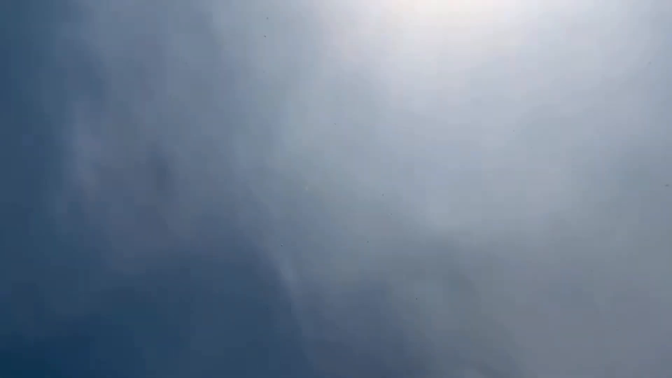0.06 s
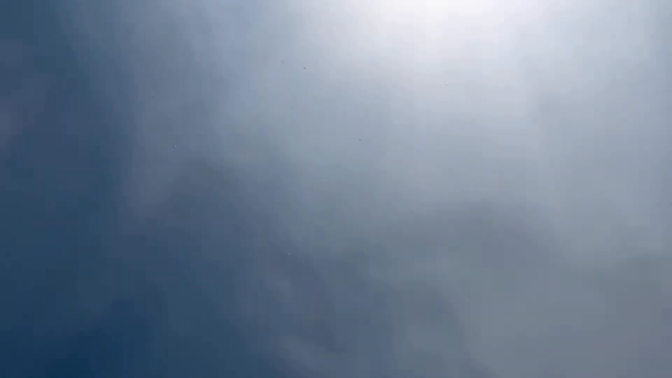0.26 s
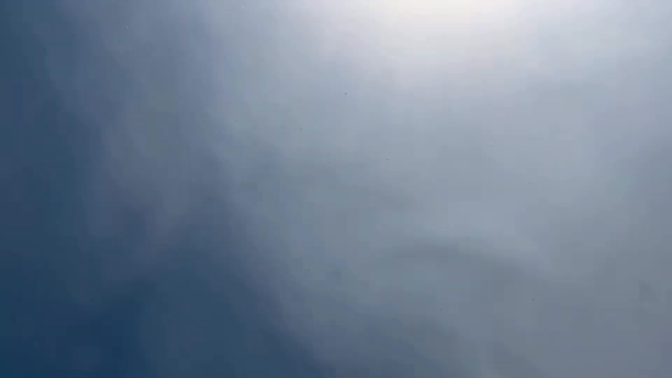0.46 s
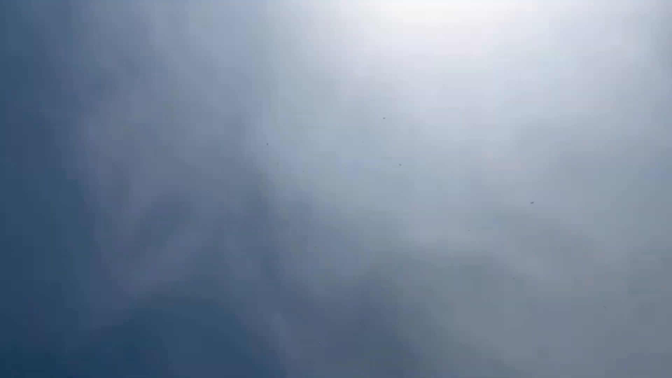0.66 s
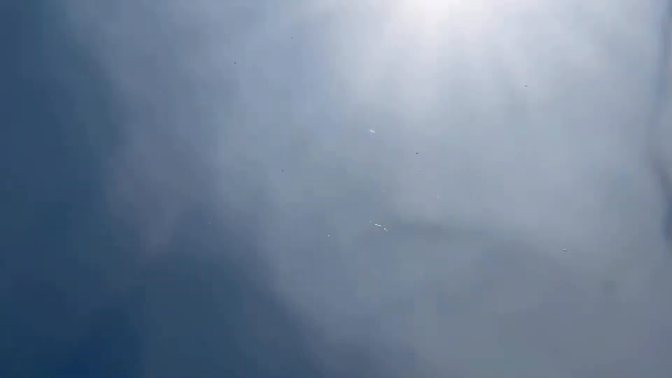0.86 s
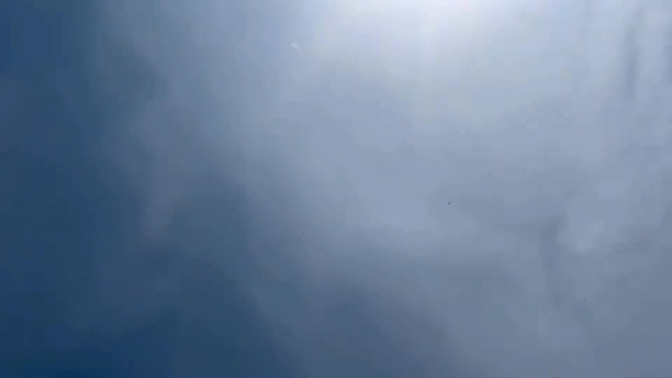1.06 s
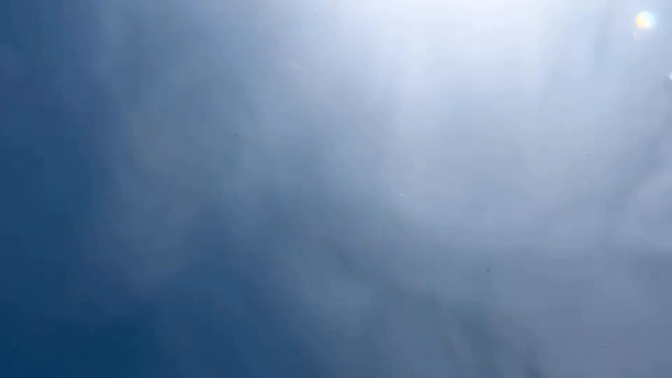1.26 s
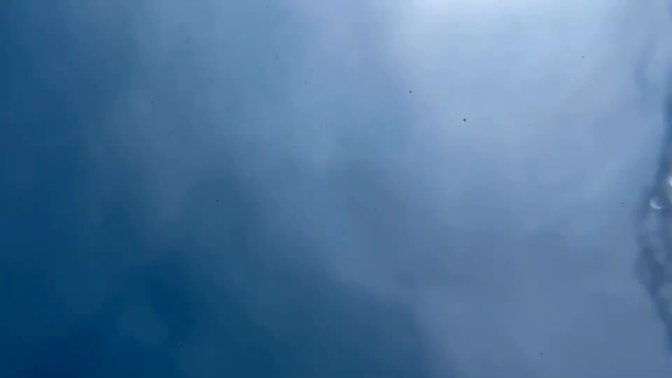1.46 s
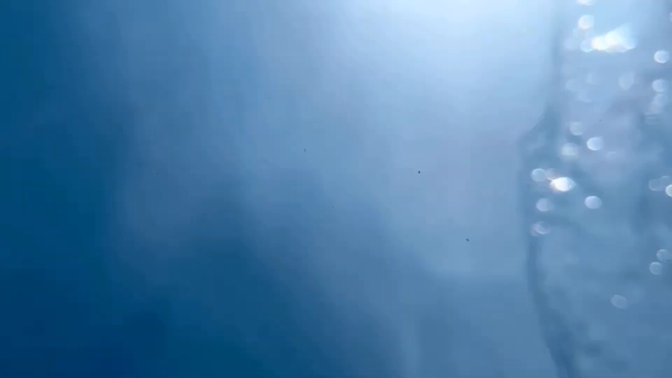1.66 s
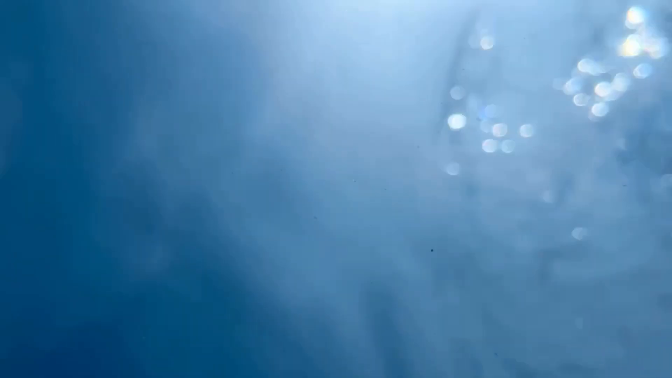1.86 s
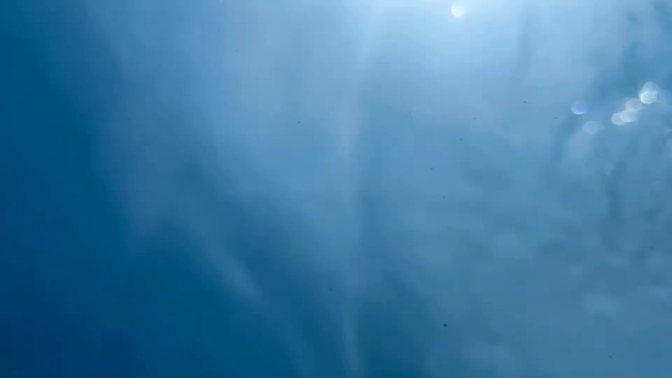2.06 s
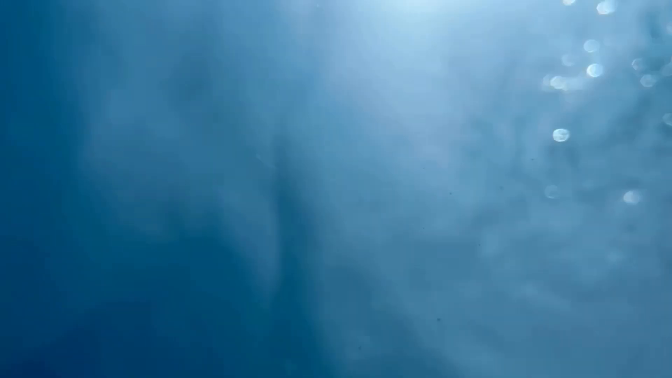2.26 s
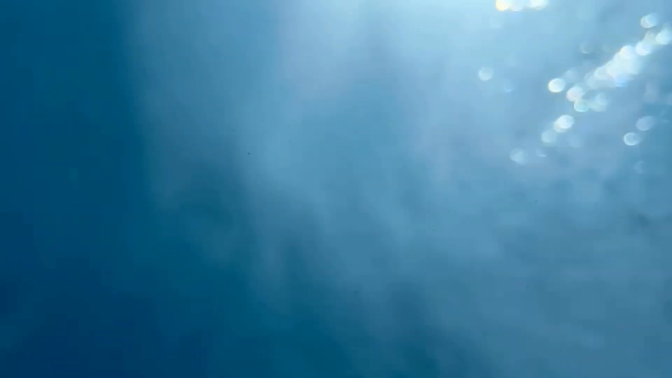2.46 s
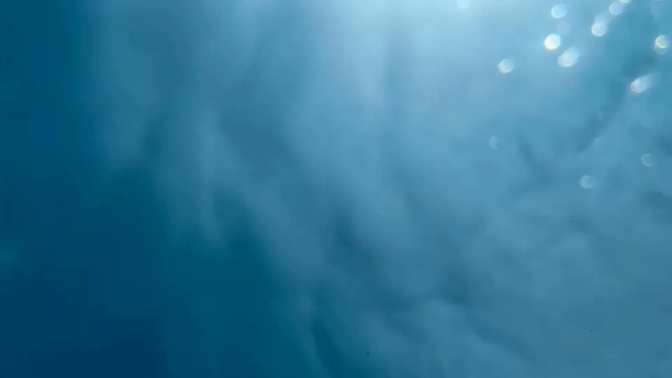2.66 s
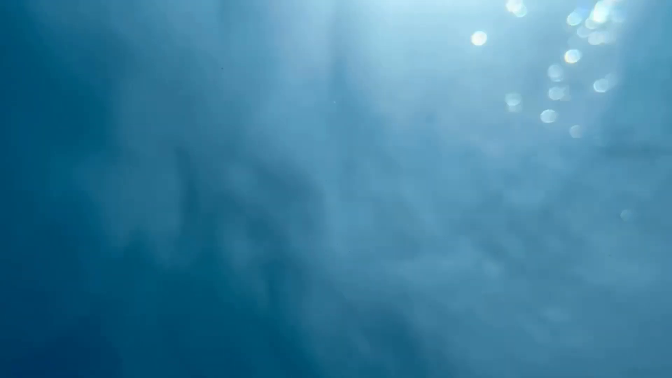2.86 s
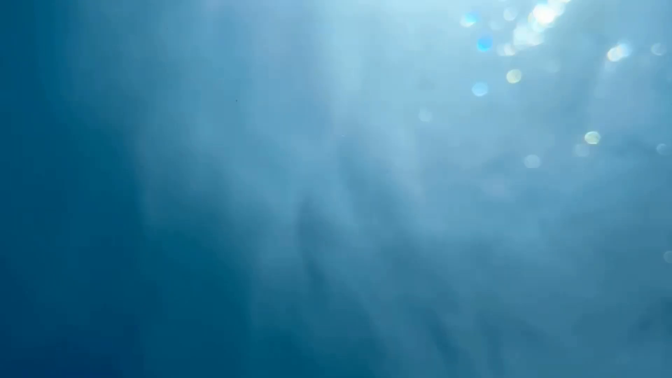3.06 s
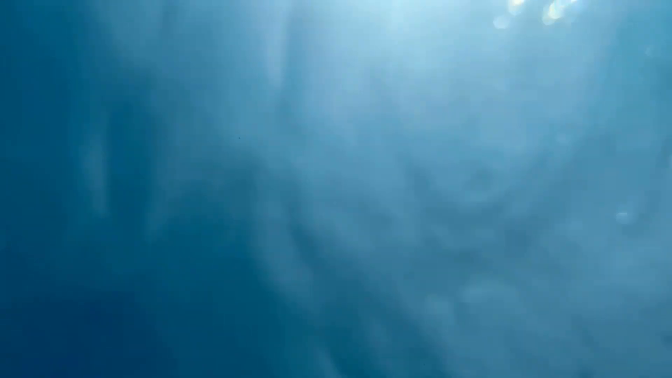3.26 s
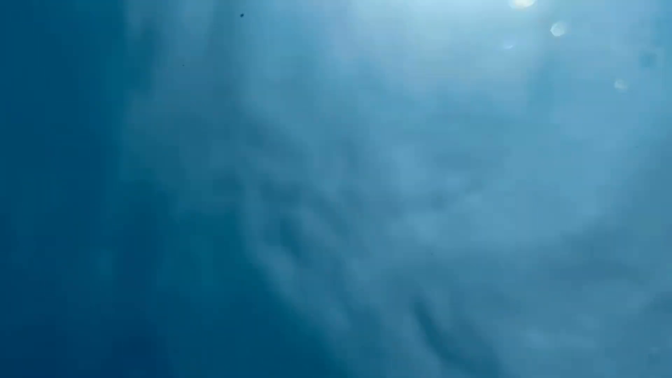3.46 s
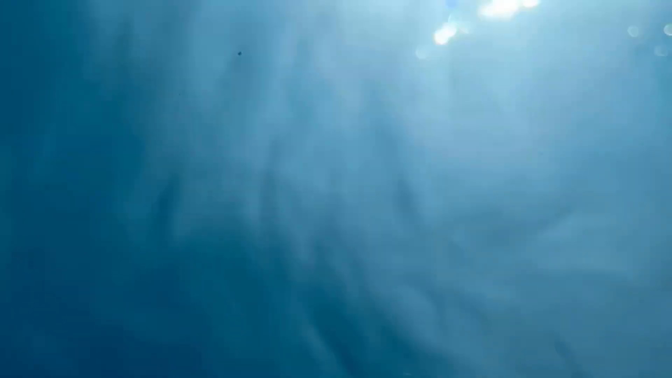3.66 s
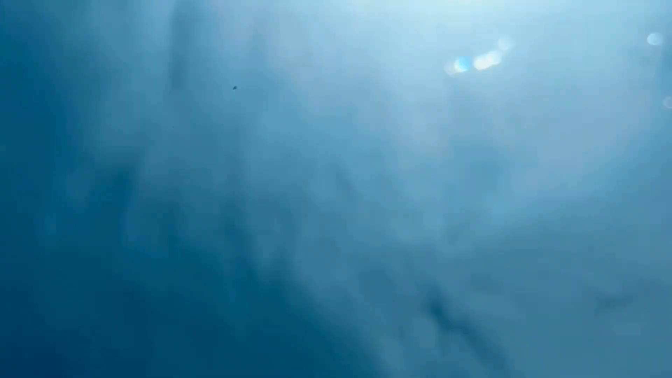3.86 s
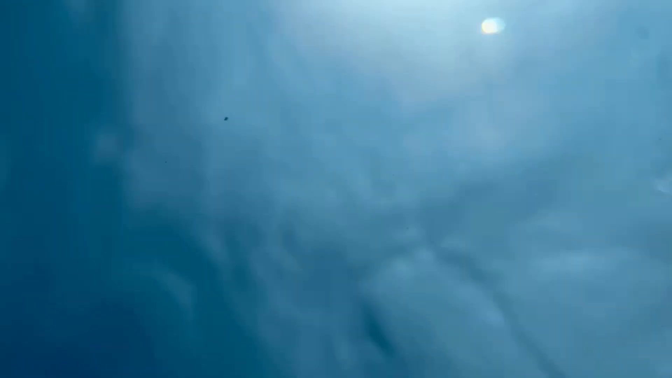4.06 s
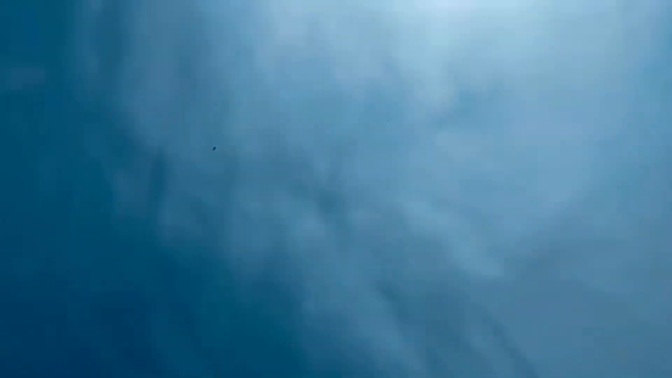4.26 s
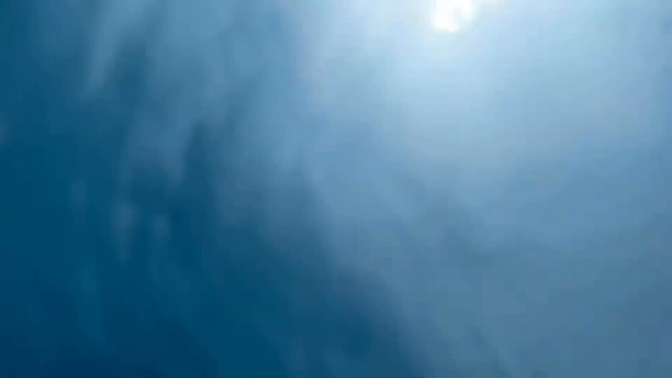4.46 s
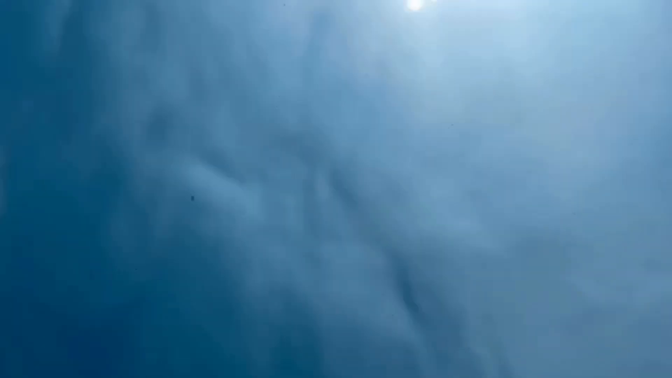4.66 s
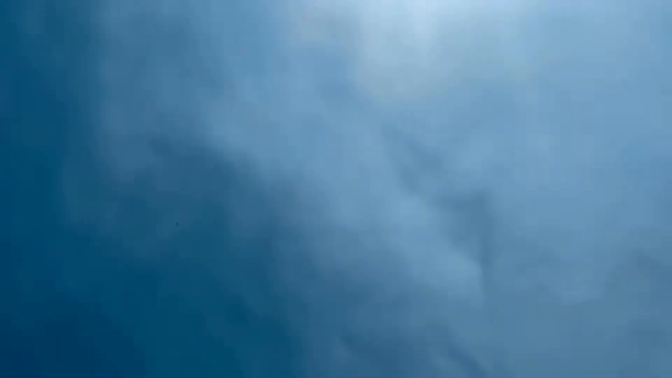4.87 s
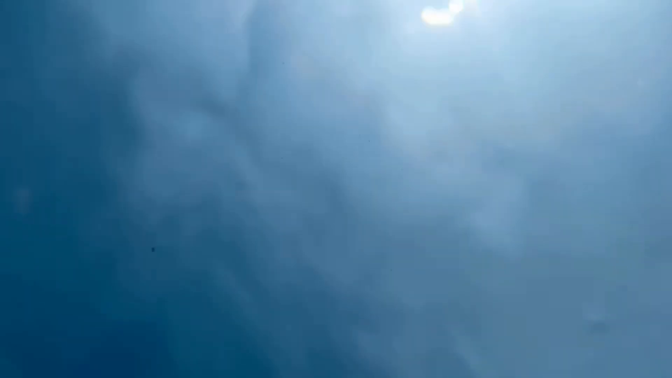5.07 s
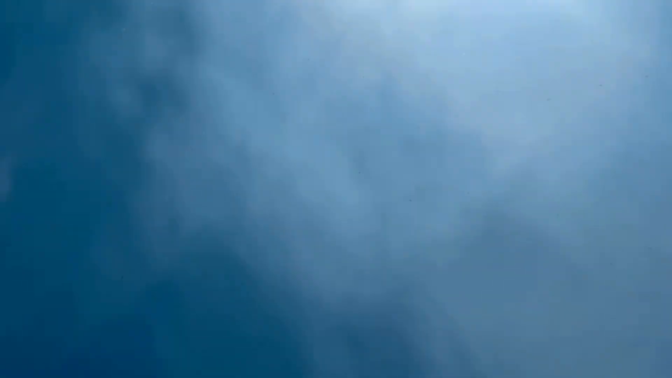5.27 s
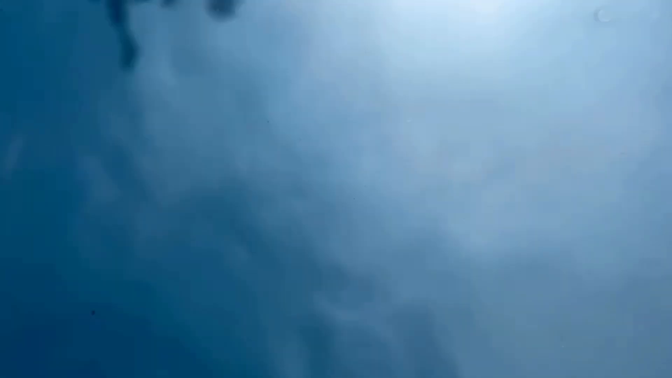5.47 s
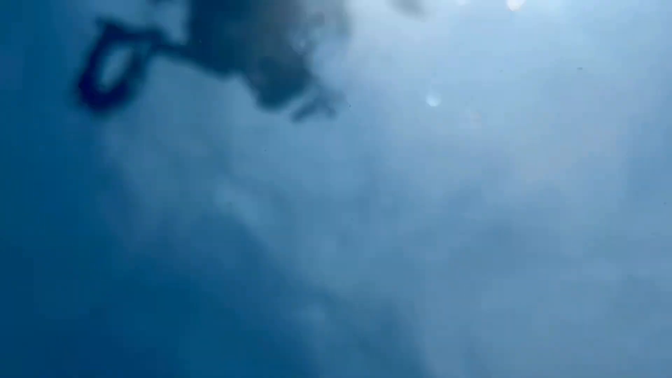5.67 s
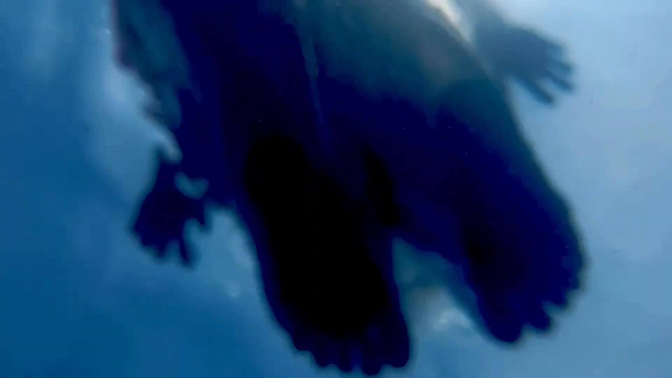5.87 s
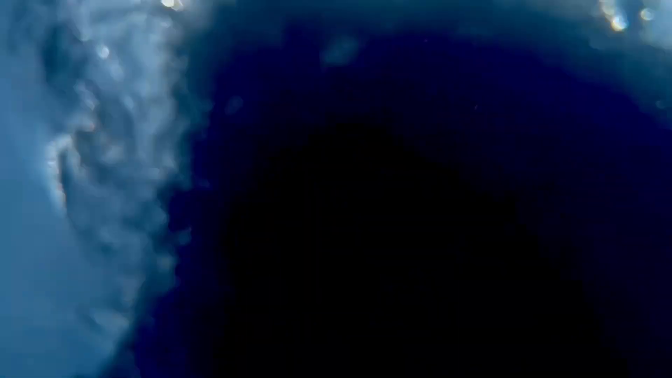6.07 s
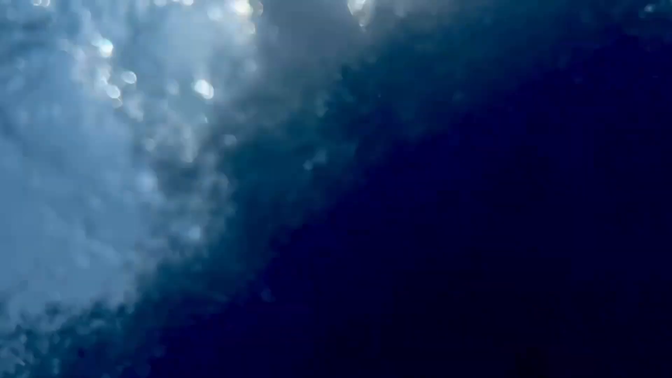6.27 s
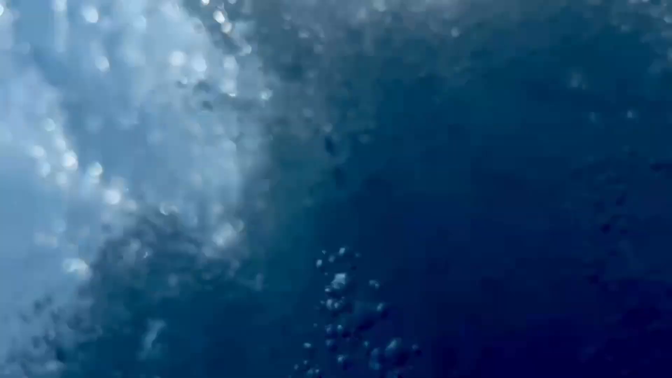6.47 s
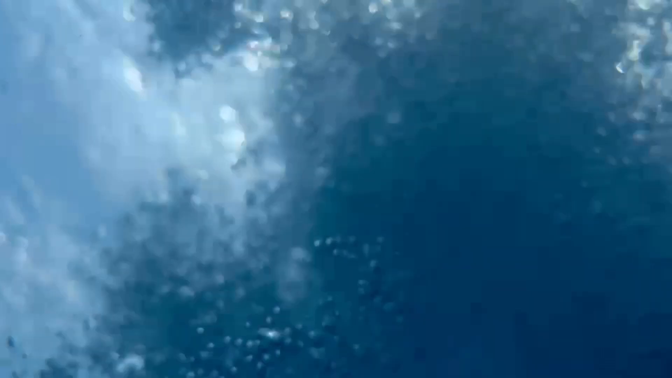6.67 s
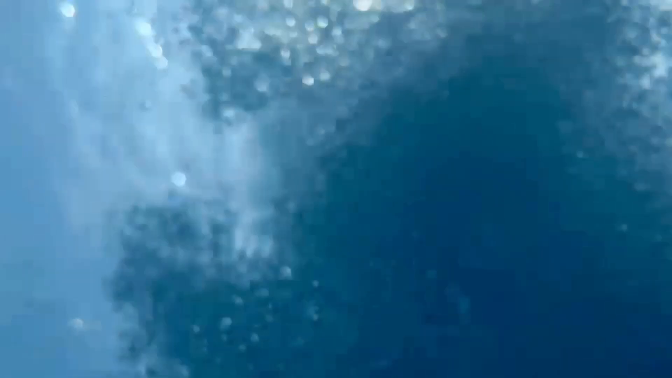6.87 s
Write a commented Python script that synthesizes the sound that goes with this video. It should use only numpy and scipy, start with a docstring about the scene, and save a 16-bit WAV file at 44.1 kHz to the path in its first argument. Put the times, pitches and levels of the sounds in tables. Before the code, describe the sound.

Just below the surface of a pool, the sound is close, muffled and bass-heavy. From 0 to 0.5 seconds, large air pockets throb and gulp over vigorous churning, with small closing slaps. A stronger slap at about 0.55 drops quickly from tick to thud; churning dips, then returns. Another loud slap at 1.38 briefly lowers both water and pump. A deep gulp follows near 1.9, then the turbulence thins. From roughly 2.3 to 5, a nearly pure low pump hum dominates, with soft, scattered bubble blips and faint fizz. One slap and throbbing gulp interrupt at 5.1. At 5.73 an animal breaks in with a heavy slap, another at 5.85, then a dense volley from 5.93 to 6.03 with sizzling spray. Boiling bubbles surge around 6, continuing as rumbling, gulping churn until 6.9.

```python
"""Deep throbs and a heavy churn open the scene, heard just under the surface of a pool.
Air pockets swell and sag in pitch; cavities dive from a tick to a thud as they slap shut.
Small bubbles blip and knock as decaying sines, swarms of them make the churn, gurgle and fizz, and
a pump hums as a nearly pure tone over the rumble of its flow, dipping briefly after a loud slap.
Near the end an animal plunges in: a volley of slaps, then a churning cloud of bubbles."""
import sys
import numpy as np
from scipy import signal
from scipy.fft import rfft, irfft
from scipy.io import wavfile
from scipy.ndimage import uniform_filter1d, minimum_filter1d

SR = 44100
rng = np.random.default_rng(int(sys.argv[2]) if len(sys.argv) > 2 else 0)


def store_wav(level_fs):
    """Save 16-bit WAV to argv[1]."""
    pcm = np.round(np.clip(np.atleast_2d(level_fs), -1, 1) * 32767)
    wavfile.write(sys.argv[1], SR, pcm.T.astype(np.int16))


N = 305169
TIME = np.arange(N) / SR  # s

# level of the pump's hum as heard, with a brief dip after the slap near 1.38 s: [t/s, level/dB]
PUMP_LEVEL = [(0, -32), (1.38, -24.5), (1.5, -39), (1.62, -23.5), (3.1, -21), (5.1, -21.5), (6.92, -22.5)]
# level of the water's churning as heard, with dips after loud slaps, 0 = brisk churning: [t/s, level/dB]
WATER_LEVEL = [(0.0, 9), (0.38, 6), (0.53, -0.5), (0.58, -12.5), (0.69, -11.5), (0.76, -1), (1.36, 1),
               (1.42, -21.5), (1.52, -16.5), (1.68, -10), (2.33, -18), (2.65, -23), (3.15, -23),
               (3.55, -32), (4.15, -27), (4.85, -34), (5.09, -31), (5.13, -3.5), (5.19, -23), (5.33, -22.5),
               (5.55, -33.5), (5.82, -29.5), (5.91, 3), (6.01, 4), (6.06, -20), (6.15, 4), (6.26, -21.5),
               (6.92, -20.5)]
# single small bubbles: [t/s, level/dB, f/Hz, rise/(octaves per s)]
SMALL_BUBBLES = [(0.042, -12.5, 165.8, 0.5), (0.731, -22.5, 458.6, 0.5), (1.008, -15.5, 151, 2),
                 (1.252, -26, 435, 0), (1.828, -31.5, 441, 4), (1.944, -37.5, 531, -4.5),
                 (2.215, -21.5, 112.6, 1), (2.322, -16, 126.3, 0.76), (2.554, -41.5, 204.7, 2),
                 (2.776, -41.5, 471, 2.5), (2.972, -36.5, 411, -3.5), (3.094, -31.5, 357, 3.5),
                 (3.130, -54, 1150, 1), (3.180, -42.5, 463, -1.5), (3.182, -43, 655, -8),
                 (3.899, -22.5, 103.5, 2.5), (3.964, -49, 607, 0.5), (3.989, -23.5, 98.3, -1),
                 (4.190, -33.5, 379, 5.5), (4.225, -50.5, 714, -2.5), (4.576, -56, 1000, 3),
                 (4.903, -50.5, 232, 2), (5.331, -54, 527, 4.5), (5.7327, -33, 5880, -6),
                 (5.7328, -43, 3010, 2.5), (5.8495, -42.5, 2270, 1.5), (6.738, -51.5, 1442, 0),
                 (6.867, -45, 1700, 5)]
# bubbles pinched off close by, struck hard and dead at once: [t/s, level/dB, f/Hz]
CLOSE_BUBBLES = [(0.5530, -18.5, 350), (1.363, 3, 123), (1.3760, -9, 560), (5.1010, -3.5, 180),
                 (5.7343, -2, 506), (5.7375, -17, 690), (5.798, -31, 420), (5.8520, -9, 970),
                 (5.8555, -15, 700), (5.9300, -9.5, 474), (5.9410, -18.5, 650), (5.9825, 0.5, 618),
                 (5.9913, -11.5, 450), (6.0026, -4.5, 722), (6.0170, -20.5, 450)]
# large air pockets set throbbing: [t/s, level/dB, first f/Hz, fade/s]
AIR_POCKETS = [(0.05, -1, 89.3, .07), (0.172, -3.5, 66.2, 0.033), (0.215, -1, 99, 0.051),
               (0.315, -2.5, 115.2, 0.1), (0.44, -10, 133.5, 0.041), (0.505, 1, 135, 0.032),
               (0.558, -7, 68.8, 0.18), (0.785, -1.5, 100.8, 0.12), (0.969, -7, 66.8, 0.038),
               (1.054, 0.5, 94, 0.051), (1.148, -1, 94, 0.051), (1.387, -3.5, 104, 0.054),
               (1.864, 1.5, 77.9, .13), (2.085, -9, 94.5, 0.034), (5.113, -1, 97.7, 0.085),
               (5.239, -3, 66.7, .075), (5.376, -5.5, 66, 0.019), (5.734, -2.5, 87, 0.056),
               (5.923, -4, 110, 0.034), (5.96, 0, 77.6, 0.065), (6.04, 0, 90.2, 0.049), (6.115, 1, 72, .04),
               (6.205, -2.5, 102.1, 0.048), (6.279, -4.5, 96, 0.082), (6.365, 4, 102.6, 0.049),
               (6.41, -7.5, 133.8, .03), (6.454, -2.5, 90.8, 0.058), (6.59, -4.5, 115.8, 0.094),
               (6.74, 2.5, 91.7, 0.024), (6.788, 2, 95.2, .04), (6.862, -9, 126, 0.042)]
# cavities slapping shut: [t/s, level/dB, first f/Hz, last f/Hz, jet level/dB]
CAVITIES = [(0.2567, -16.5, 2200, 128, -62.5), (0.3736, -9.5, 2400, 120.6, -38),
            (0.5439, -23.5, 2000, 120, -46.5), (0.556, 0.5, 2900, 74.8, -39), (0.8338, -19, 2000, 110, -65),
            (1.3765, 3.5, 1400, 91, -21.5), (5.1208, -7, 3200, 90, -43), (5.7367, 6, 644, 74, -34),
            (5.794, -22, 1200, 139, -48), (5.8525, 4, 850, 75.3, -36), (5.9300, 2.5, 1046, 106.5, -30.5),
            (5.9410, -6, 1200, 141.5, -35.5), (5.9495, -12, 1090, 170, -47), (5.974, -10.5, 1193, 176, -48),
            (5.9815, -0.5, 1210, 140.7, -41), (5.9920, -3.5, 1200, 151, -38),
            (6.0029, -6, 1400, 139.6, -31.5), (6.0177, -8.5, 800, 150, -52), (6.0260, -19, 1010, 160, -45),
            (6.133, -18.5, 1197, 149, -58.5), (6.1562, -19.5, 1200, 150, -50),
            (6.1710, -17, 1210, 150, -52), (6.1854, -11, 1100, 140, -43), (6.398, -19, 800, 150, -64),
            (6.414, -24.5, 750, 150, -69), (6.46, -23, 850, 148, -62.5), (6.8045, -26.5, 1212, 155, -58.5)]

# relative spectrum of the deep churn: [f/Hz, level/dB]
CHURN_COLOUR = [(20, -13.5), (35, -2.5), (60, -0.5), (100, 2), (140, -1), (190, -14.5), (260, -19.5),
                (400, -36.5), (800, -79.5)]
# relative spectrum of the gurgle: [f/Hz, level/dB]
GURGLE_COLOUR = [(120, -25.5), (230, -9), (330, -5.5), (400, -3), (465, 0.5), (520, 0), (600, -2),
                 (690, -12), (1000, -23), (2000, -62)]
# relative spectrum of the fizz: [f/Hz, level/dB]
FIZZ_COLOUR = [(400, -15.5), (800, 4), (950, -2.5), (1500, -6.5), (1800, -18), (2100, -12.5), (2500, -26.5),
               (3000, -17), (4200, -30.5), (5800, -23), (7500, -38.5), (15000, -43)]
# relative spectrum of the plunge's boiling bubbles: [f/Hz, level/dB]
BOIL_COLOUR = [(100, -13), (190, 5.5), (260, .5), (360, -8), (500, -18), (700, -29.5), (1500, -50.5),
               (3000, -80.5)]
# relative spectra of the other layers: [f/Hz, level/dB]
HISS_COLOUR = [(500, -0.5), (2000, -0.5), (5000, -5), (8000, -16), (12000, -14.5), (15000, -20.5)]
FLOW_COLOUR = [(22, -21.0), (42, -5.0), (65, 1.5), (100, 2.5), (125, -9.5), (160, -22.5),
               (300, -36.5), (800, -69.0)]
PING_COLOUR = [(1500, -13.0), (3100, 2.0), (4300, -10), (5800, -4.5), (7500, -20), (15000, -40.5)]
SPRAY_COLOUR = [(200, -19), (700, -0.5), (1300, -3), (2500, -11.0), (5000, -21.5), (8000, -30.5),
                (15000, -41)]

# likeness of left and right, clipped to 0-1 when used: [f/Hz, likeness]
LIKENESS = [(60, 1.83), (130, 0.54), (290, 2.4), (640, -0.65), (1400, -0.27), (3000, 0.7), (15000, 0.6)]
# left over right: [f/Hz, level/dB]
LEFT_OVER_RIGHT = [(60, -3), (200, 2.5), (400, 5), (700, -2), (1290, -6), (2400, 2), (8000, 2)]

PUMP_HZ, MOTOR_HZ = 58.25, 120
BLIP_CYCLES, KNOCK_CYCLES = 9.5, 1.9  # decay in cycles, so higher bubbles die sooner
GULP_SWELL_S, GULP_SAG_S, GULP_REST_HZ = 0.0078, .055, 60.2  # quick swell, then a sag toward one deep pitch
GULP_FADE_SHAPE = 1.5  # 1 = a plain ring-down, more = holds before it fades
SLAP_DIVE_CYCLES, SLAP_RING_CYCLES = 1.9, 1.32  # length of the dive, decay of the thud
ARRIVAL_S = 5.7  # the animal breaks the surface
SPRAY_CALM, SPRAY_BROKEN = 0.1, 0.8  # share of spray in a slap, before and after the arrival
PLUNGE_S, CLOUD_SWELL_S = 5.87, 0.072
SURGE_S, SURGE_WIDTH_S, SURGE_DB = 5.98, 0.041, 18.5  # the boil surges as the body enters
EDGE_HZ = 15700  # top of the band


def amp(db):
    """Decibels to gain."""
    return 10 ** (np.asarray(db) / 20)


def unit(x):
    """Scales to rms 1."""
    return x / np.sqrt(np.mean(x ** 2) + 1e-20)


def read(points, hz):
    """Reads a spectrum on a log-frequency axis."""
    f, value = np.transpose(points)
    return np.interp(np.log(hz + 1), np.log(f), value)


def curve(rows, column):
    """One column of a timed table, at every sample."""
    rows = np.asarray(rows)
    return np.interp(TIME, rows[:, 0], rows[:, column])


def add(mix, s, sound):
    """Mixes a sound in at time s."""
    start = round(s * SR)
    sound = sound[..., max(-start, 0):]
    part = mix[..., max(start, 0):][..., :sound.shape[-1]]
    part += sound[..., :part.shape[-1]]


def from_left(x, lag_s, lean_db):
    """A near sound is stronger on the left; any lag delays the right."""
    right = np.interp(TIME - lag_s, TIME, x)
    return np.array([x * amp(lean_db / 2), right / amp(lean_db / 2)])


def ports(pair, colour):
    """Colours two unrelated signals and blends them into a partly alike left and right of overall rms 1."""
    hz = np.fft.rfftfreq(N, 1 / SR)
    a, b = rfft(pair) * amp(read(colour, hz))
    same = np.clip(read(LIKENESS, hz), 0, 1)
    mid, side = a * np.sqrt(1 + same), b * np.sqrt(1 - same)
    lean = amp(read(LEFT_OVER_RIGHT, hz) / 2)
    return unit(irfft(np.array([(mid + side) * lean, (mid - side) / lean]), N))


def bubble(hz, decay, rise):
    """A bubble rings after a soft start and dies away; its pitch glides by rise octaves a second."""
    t = np.arange(int(6 * decay * SR) + 8) / SR
    turns = np.cumsum(hz * 2 ** (rise * t)) / SR
    onset = 1 - np.exp(-turns ** 2)
    tail = 1 - (t / t[-1]) ** 4  # closes the ring at zero
    return np.sin(2 * np.pi * turns) * np.exp(-t / decay) * onset * tail


def swarm(colour, low_hz, high_hz, per_s, cycles, spread_db, wash, count=28):
    """Bubbles of count pitches and random strength ring over the smooth wash of those farther off."""
    pair = np.zeros((2, N))
    for hz in np.geomspace(low_hz, high_hz, count) * rng.uniform(0.97, 1.04, count):
        times, sizes, side = rng.random((1500, 3)).T
        gaps = -np.log(1 - times) * count / per_s  # births come at random
        at = (np.cumsum(gaps) * SR).astype(int)
        size = amp(spread_db * np.minimum(-np.log(1 - sizes), 3))
        inside = at < N
        channel = (side > .5).astype(int)
        births = np.zeros((2, N))
        births[channel[inside], at[inside]] = size[inside]
        decay = cycles / hz
        ring = hz * bubble(hz, decay, .05 / decay)
        pair += signal.oaconvolve(births, ring[None], axes=1)[:, :N]
    return ports(unit(pair) + wash * rng.standard_normal((2, N)), colour)


def hiss(level_db=-84.0):
    """Steady coloured noise, the faintest bed of the mix."""
    return amp(level_db) * ports(rng.standard_normal((2, N)), HISS_COLOUR)


def pump(second_db=-29, flow_db=-19):
    """A nearly pure hum from the turning pump, a weak line from its motor, and the rumble of its flow."""
    hum = np.sin(2 * np.pi * PUMP_HZ * TIME)
    motor = np.sin(2 * np.pi * MOTOR_HZ * TIME)
    flow = ports(rng.standard_normal((2, N)), FLOW_COLOUR)
    tones = np.sqrt(2) * (hum + amp(second_db) * motor)
    balance = amp([[.1], [-.1]])  # a touch stronger on the left
    return amp(curve(PUMP_LEVEL, column=1)) * (tones + amp(flow_db) * flow) * balance


def churning_water(churn_db=-14.5, churn_follow=1.086, churn_top_db=-10.0, gurgle_db=-40.0,
                   gurgle_follow=1.043, fizz_db=-52, fizz_follow=0.73):
    """Three sizes of bubble swarm follow the water level; the deep churn grows fastest, then levels off."""
    level = curve(WATER_LEVEL, column=1)  # each follow is in dB per dB of this
    churn = swarm(CHURN_COLOUR, 35, 300, per_s=440, cycles=2.6, spread_db=-1, wash=5.3)
    churn *= amp(np.minimum(churn_db + churn_follow * level, churn_top_db))
    gurgle = swarm(GURGLE_COLOUR, 220, 800, per_s=450, cycles=8, spread_db=4.0, wash=3.2)
    gurgle *= amp(gurgle_db + gurgle_follow * level)
    fizz = swarm(FIZZ_COLOUR, 650, 1750, per_s=2000, cycles=8.9, spread_db=4.5, wash=2.6)
    fizz *= amp(fizz_db + fizz_follow * level)
    return churn + gurgle + fizz


def pings(level_db=-77, follow=0.54):
    """Tiny bubbles prickle faintly on their way up, louder when the churning is heard louder."""
    prickle = swarm(PING_COLOUR, 2600, 4400, per_s=74, cycles=5.8, spread_db=4, wash=0, count=12)
    return amp(level_db + follow * curve(WATER_LEVEL, column=1)) * prickle


def blips(echo_db=-11, echo_decay=0.092):
    """Single nearby bubbles, blurred by short echoes off the rippled surface."""
    out = np.zeros(N)
    for s, db, hz, rise in SMALL_BUBBLES:
        add(out, s, amp(db) * bubble(hz, BLIP_CYCLES / hz, rise))
    t = TIME[:SR // 6]
    echo = rng.standard_normal((2, len(t))) * np.exp(-t / echo_decay)
    wet = signal.oaconvolve(out[None], echo / np.linalg.norm(echo[0]), axes=1)[:, :N]
    return from_left(out, lag_s=0.00033, lean_db=2.5) + amp(echo_db) * wet


def knocks(lag_s=0.0004, lean_db=3):
    """Bubbles dead within a few cycles give short hollow rings, so close that left and right differ."""
    out = np.zeros(N)
    for s, db, hz in CLOSE_BUBBLES:
        add(out, s, amp(db) * bubble(hz, KNOCK_CYCLES / hz, rise=0))
    return from_left(out, lag_s, lean_db)


def gulps():
    """Each large pocket swells into a throb, and its pitch moves toward one deep rest as it fades."""
    out = np.zeros(N)
    for s, db, first_hz, fade in AIR_POCKETS:
        t = np.arange(int(5 * fade * SR)) / SR
        swell = 1 - np.exp(-(t / GULP_SWELL_S) ** 2)
        height = swell * np.exp(-(t / fade) ** GULP_FADE_SHAPE)
        hz = GULP_REST_HZ + (first_hz - GULP_REST_HZ) * np.exp(-t / GULP_SAG_S)
        add(out, s, amp(db) * height * np.sin(2 * np.pi * np.cumsum(hz) / SR))
    return from_left(out, lag_s=.00015, lean_db=0.67)


def slaps(tilt=0.78, soft_hz=400):
    """A closing cavity dives from a tick to a thud within two or three cycles."""
    out = np.zeros(N)
    for s, db, first_hz, last_hz, _ in CAVITIES:
        decay = SLAP_RING_CYCLES / last_hz
        t = np.arange(int(12 * decay * SR)) / SR
        hz = last_hz + first_hz / (1 + t * first_hz / SLAP_DIVE_CYCLES) ** 2
        turns = np.cumsum(hz) / SR
        soft = (soft_hz / first_hz) ** 1.1  # small, high cavities snap; large ones close softly
        growth = (last_hz / hz) ** tilt  # louder as it deepens
        height = growth * np.exp(-t / decay) * (1 - np.exp(-turns / soft))
        add(out, s, amp(db) * height * np.sin(2 * np.pi * turns))
    return from_left(out, lag_s=.00002, lean_db=1.2)


def spray(snap_db=17, burst_db=-2, burst_s=0.0014, drops_db=-19, drops_decay=0.012):
    """Each slap shoots a jet: mostly a clean snap under a calm surface, mostly puff and sizzle once broken."""
    t, snaps, puffs = TIME[:SR // 8], np.zeros(N), np.zeros(N)
    burst = amp(burst_db) * np.e * t / burst_s * np.exp(-t / burst_s)
    drops = amp(drops_db) * np.exp(-t / drops_decay)
    for s, *_, db in CAVITIES:
        share = SPRAY_CALM if s < ARRIVAL_S else SPRAY_BROKEN
        add(snaps, s, -(1 - share) * amp([db + snap_db]))  # a snap begins as a drop in pressure
        add(puffs, s, share * amp(db) * (burst + drops))
    snap_colour = unit(amp(read(SPRAY_COLOUR, np.fft.rfftfreq(N, 1 / SR))))
    snaps = irfft(rfft(snaps) * snap_colour, N)
    noise = ports(rng.standard_normal((2, N)), SPRAY_COLOUR)
    return from_left(snaps, lag_s=0, lean_db=1.2) + puffs * noise


def cloud(boil_db=-26.5, boil_fade_db_per_s=5.5, rumble_db=-14, rumble_fade_db_per_s=4):
    """Air dragged under by the plunge breaks into middling bubbles over a longer rumble of large ones."""
    age = np.maximum(TIME - PLUNGE_S, 0)
    surge_db = SURGE_DB * np.exp(-((TIME - SURGE_S) / SURGE_WIDTH_S) ** 2)
    boil = swarm(BOIL_COLOUR, 160, 650, per_s=380, cycles=3.9, spread_db=3.8, wash=3)
    boil *= amp(boil_db + surge_db - boil_fade_db_per_s * age)
    rumble = swarm(CHURN_COLOUR, 35.9, 300, per_s=300, cycles=2.3, spread_db=0, wash=2)
    rumble *= amp(rumble_db - rumble_fade_db_per_s * age)
    swell = 1 - np.exp(-(age / CLOUD_SWELL_S) ** 2)
    return swell * (boil + rumble)


def scene():
    """Layers the water sounds over the hiss and the pump."""
    background = hiss() + pump() + churning_water() + pings()
    bubbles = blips() + knocks() + gulps()
    return background + bubbles + slaps() + spray() + cloud()


def record(dry, whistle_db=-58):
    """A limiter holds the crests; a faint whistle rides on the loud rumble; then a soft end and the band limit."""
    need = np.minimum(1, .93 / (abs(dry).max(0) + 1e-9))
    gain = minimum_filter1d(need, size=500)
    gain = uniform_filter1d(uniform_filter1d(gain, size=250), size=250)
    held = dry * gain
    whistle = np.sin(2 * np.pi * 9600 * TIME)
    fade = np.sin(np.pi / 2 * np.minimum(1, TIME[::-1] / .006)) ** 2  # last 6 ms
    held = held * (1 + amp(whistle_db) * whistle * abs(held)) * fade
    band = signal.firwin(201, EDGE_HZ, window=("kaiser", 9), fs=SR)
    return signal.filtfilt(band, 1, held)


dry = scene()
out = record(dry)
store_wav(out)
```